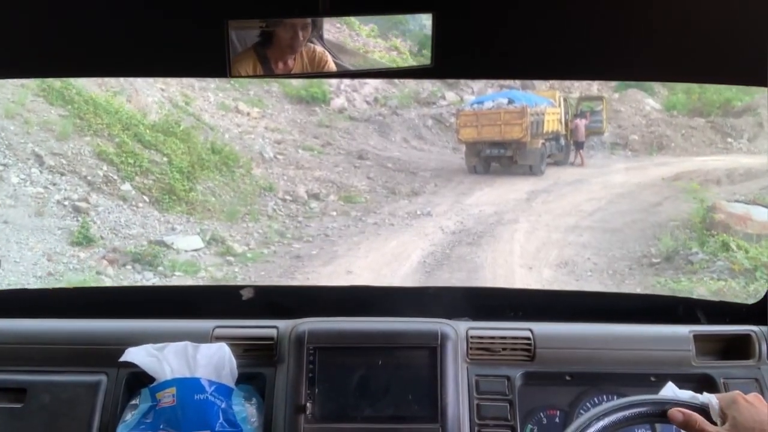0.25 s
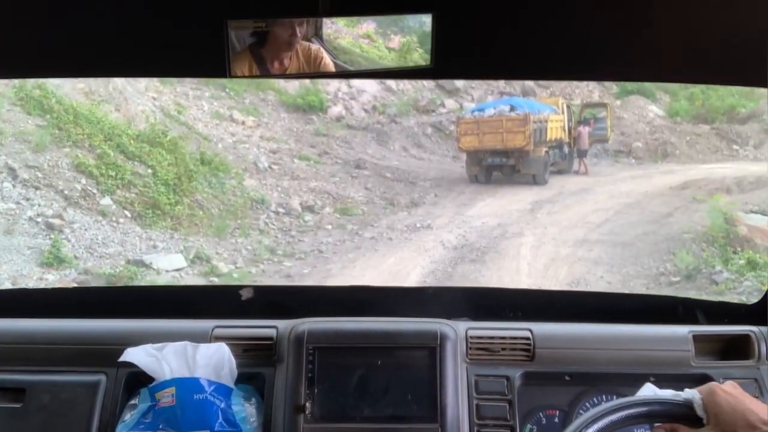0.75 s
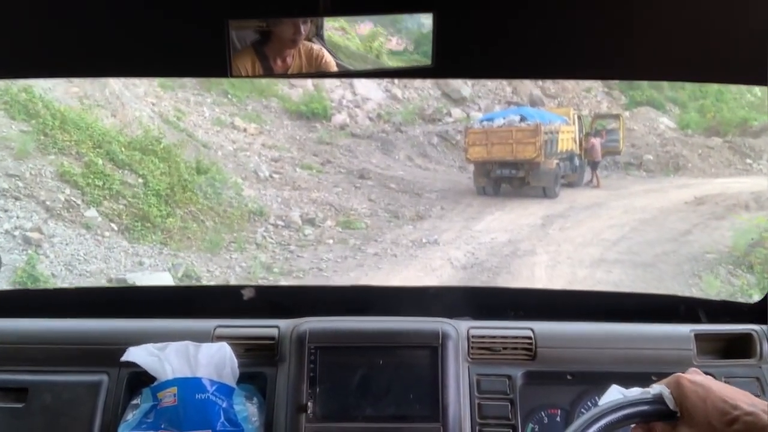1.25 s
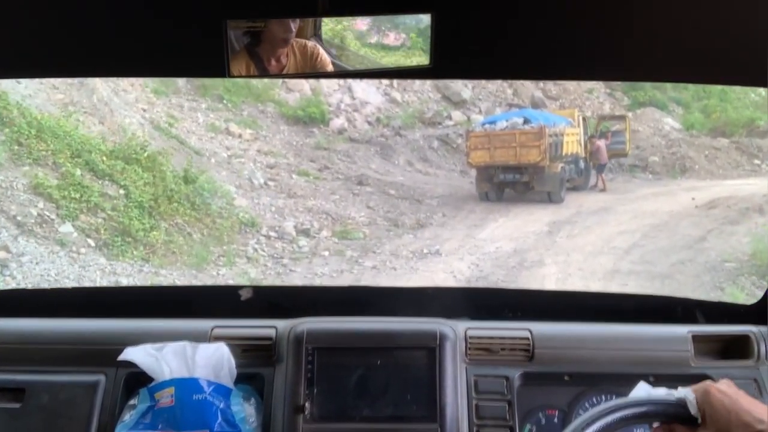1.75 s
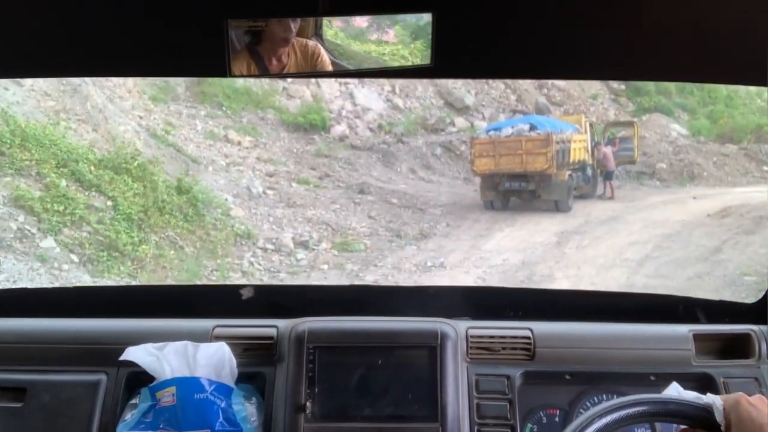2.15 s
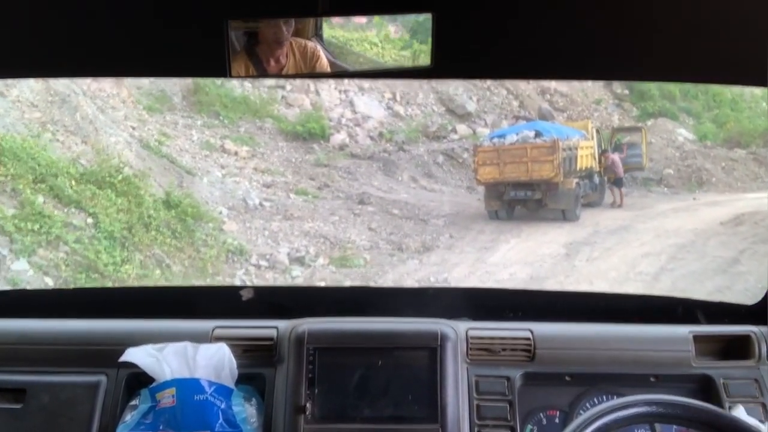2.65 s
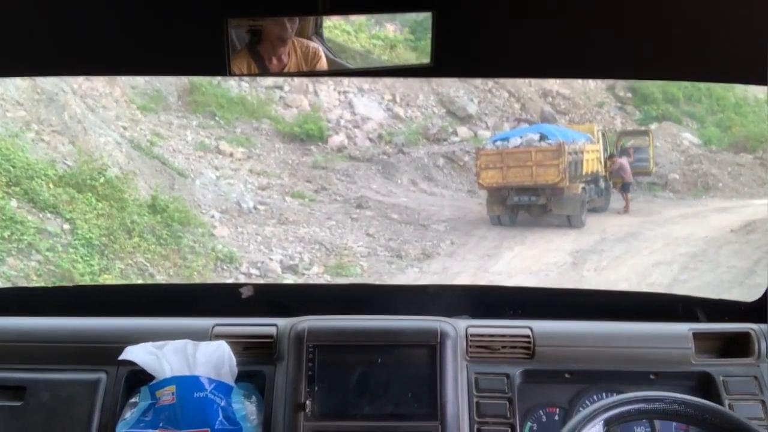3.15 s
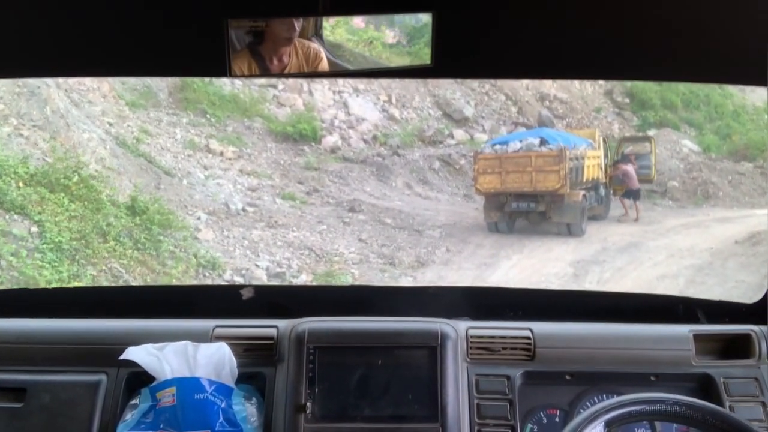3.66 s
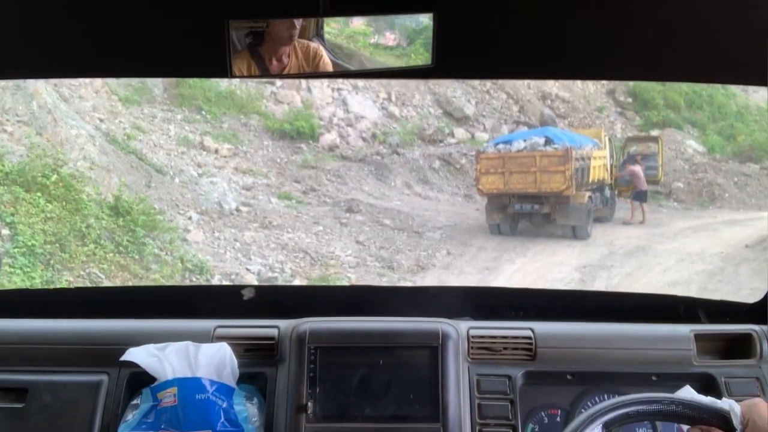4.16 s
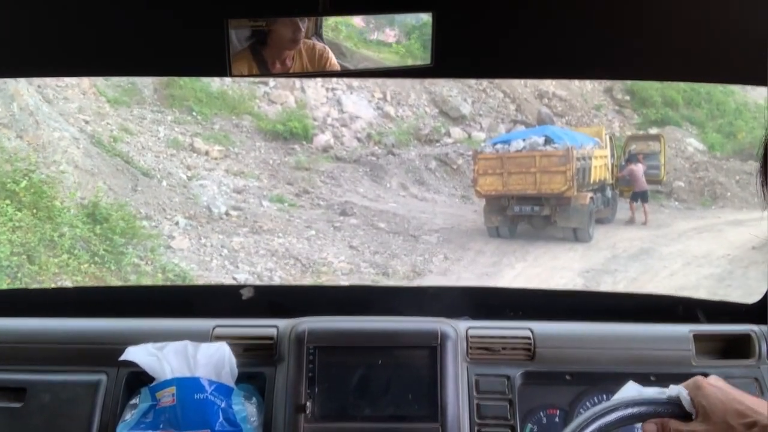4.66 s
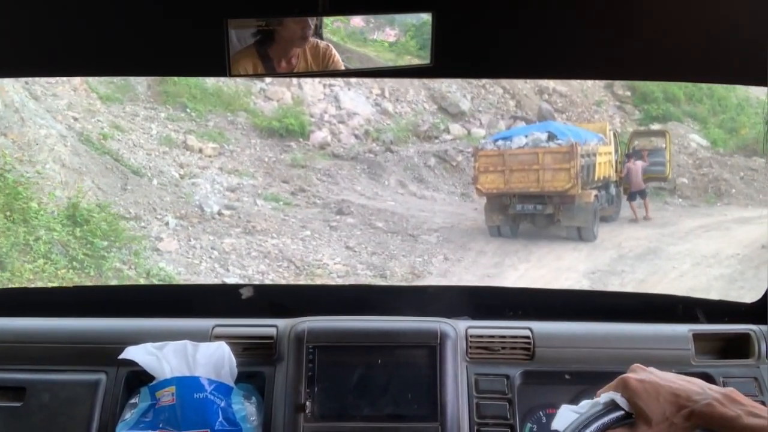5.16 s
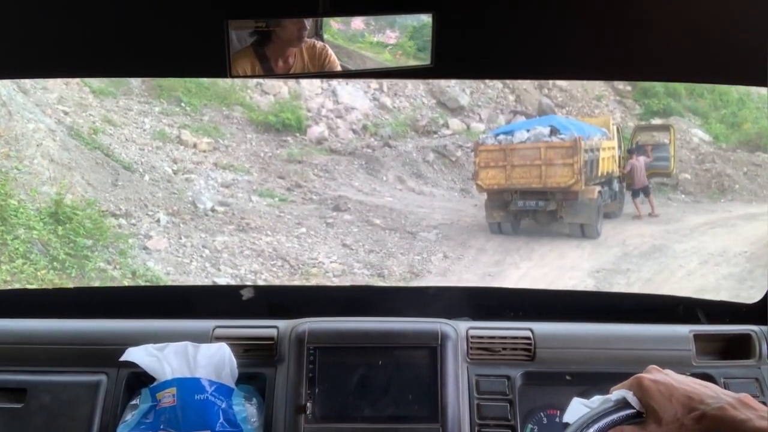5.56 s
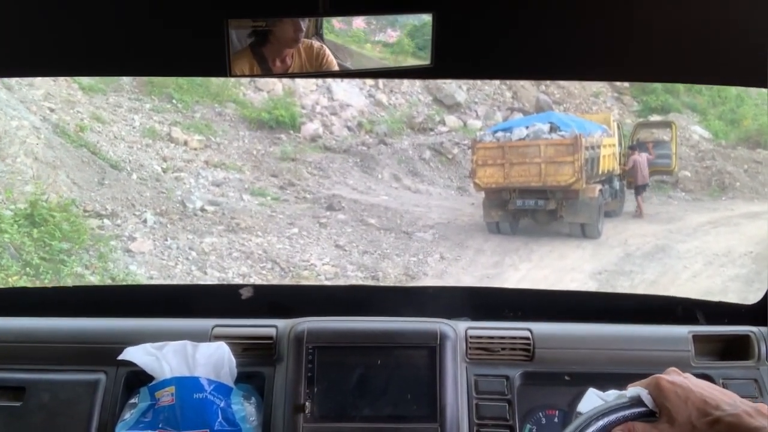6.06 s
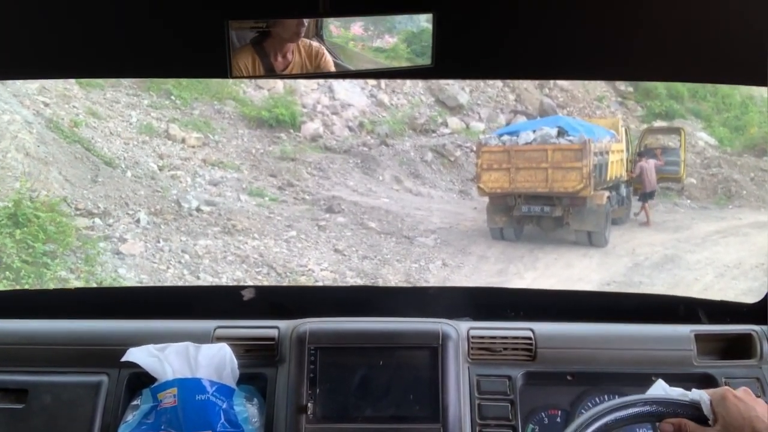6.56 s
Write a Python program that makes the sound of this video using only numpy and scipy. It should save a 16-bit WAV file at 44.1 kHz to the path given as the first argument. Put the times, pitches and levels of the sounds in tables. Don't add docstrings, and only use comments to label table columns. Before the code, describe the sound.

Inside a truck cab, a low diesel engine throbs and slowly winds down while trim rattles and the dashboard knocks on a rough dirt track.

```python
import sys
import numpy as np
from scipy import signal
from scipy.fft import rfft, irfft
from scipy.io import wavfile
from scipy.ndimage import uniform_filter1d

SR = 44100
rng = np.random.default_rng(int(sys.argv[2]) if len(sys.argv) > 2 else 0)


def file_out(sig):
    cols = np.atleast_2d(sig).T
    lim = np.clip(cols, -1, 1)
    pcm = np.round(lim * 32767).astype(np.int16)
    wavfile.write(sys.argv[1], SR, pcm)


def nominal_scale(level):
    x = np.asarray(level, float) / 20
    return 10 ** x


N = 300321
T = np.arange(N) / SR
SLOW = T[::256]
HZ = np.fft.rfftfreq(N, 1 / SR)

# time_s, firing_rate_hz, load_db
ENGINE_RUN = [(0.0, 35.35, -3), (0.2, 34.94, -5), (0.47, 35.18, -1.5), (0.75, 37.58, -6),
              (1.25, 37.27, -7.5), (1.6, 35.92, -5.5), (2.05, 34.52, -2.5), (2.42, 34.95, -1.5),
              (2.8, 34.05, -6.5), (3.3, 29.84, -4), (3.62, 31.65, -11), (4.0, 29.7, -8), (4.3, 28.24, -13),
              (4.8, 28.44, -5.5), (5.4, 23.57, -15.5), (5.85, 25.34, -14), (6.45, 25.42, -16),
              (6.81, 24.4, -19)]
# multiple, full_load_level_db, load_share
FIRING_MULTIPLES = [(1, -22.5, 1.13), (2, -31.5, 0.52), (3, -36.5, 1.13), (6, -50.5, 1.3)]
# multiple, full_load_level_db, load_share
SHAFT_MULTIPLES = [(1.5, -43.5, 0.7), (4, -47.5, 0.079), (5.5, -47, 0.74), (8, -48.5, 0.09),
                   (12, -60, 0.083)]
# pitch_hz, width_hz, lift_db
CAB_AIR = [(81, 2.1, 7.5), (113.3, 6, 10), (199.4, 8.1, 9), (299.7, 7.9, 2)]
SURGES = {1: [(4, -19, 0.087), (3.79, 7, 0.24), (2.05, 5.5, 0.27), (4.65, 6, 0.044), (5.25, 9, 0.11),
          (0.17, 2, .2), (0.9, 3.5, 0.33), (3.02, 1, 0.16)], 1.5: [(.95, 6, 0.12), (1.4, 20, 0.16),
          (1.8, 4, 0.097), (2.7, 8, 0.1), (5.3, 13, 0.072)], 2: [(1.2, 6.5, .6), (2.45, -8.5, 0.45),
          (3.95, 6.5, 0.091), (5.4, 2.5, 0.22)], 3: [(.2, 6.5, 0.18), (.9, 5, 0.31),
          (1.6, 6.5, 0.24), (2.7, -10, 0.093), (6.0, 20.5, 0.19)]}
MORE_SURGES = {4: [(4.575, 17, 0.4), (4.62, -7.5, 0.078), (2.22, 6, 0.12), (0.47, -9, 0.27),
               (3.45, 7, 0.092), (3.45, 7, 0.092), (6.0, 11, .15)], 5.5: [(.4, 5.5, 0.31), (1.3, 3.8, .3)],
               6: [(2.15, 14.4, 0.35), (2.95, 8, 0.21)], 8: [(3.2, 13.2, .12), (4.65, 12.2, 0.34),
               (5.1, 10.8, 0.051), (5.45, 12.5, 0.16), (5.9, 12, 0.17), (6.22, 18.6, 0.03),
               (2.6, 5.6, 0.14)], 8.5: [(.3, 11.3, 0.4), (1.72, 6.9, 0.05), (2.4, 6, 0.25),
               (2.85, 13, 0.12)], 12: [(5.77, 16.7, 0.37), (5.5, 9.9, .08)]}
# pitch_hz, width_hz, level_db, cycle_share (0-1, gated by the engine cycle)
BLOCK_RINGS = [(483, 77, -50, 0.36), (823.6, 28, -57.5, 0.22), (1079, 165, -55, 0.37), (1439, 39, -61, 1),
               (2226, 54, -67.5, 0.46), (3306, 61, -69, 0), (4120, 18, -80, 0)]
# centre_s, level_db, half_length_s
INJECTOR_KNOCK = [(4.5, 10, .68)]

# start_s, peak_db, centre_hz, length_s
RATTLES = [(0.026, -27.5, 1865, 0.013), (0.1, -28.5, 1920, 0.02), (0.29, -32.5, 1960, 0.04),
           (1.105, -29.5, 2410, 0.045), (1.142, -35, 3460, 0.072), (1.253, -30.5, 2920, 0.037),
           (1.281, -26, 1811, 0.044), (1.5276, -28, 1740, 0.025), (2.108, -41, 1610, 0.06),
           (2.527, -26.5, 1760, 0.022), (2.759, -22, 1960, 0.0081), (3.013, -39, 2127, 0.016),
           (3.707, -31.5, 4850, 0.053), (3.797, -31.5, 2222, 0.019), (3.861, -34.5, 1952, 0.043),
           (3.91, -35, 2099, 0.087), (4.267, -34, 1932, 0.018), (4.47, -40, 1782, 0.031),
           (2.806, -42, 1500, 0.038), (5.26, -34, 1950, 0.012), (5.411, -33.5, 3830, 0.043),
           (5.475, -36.5, 2858, 0.071), (5.8241, -35.5, 1763, 0.034), (6.2032, -36.5, 2700, 0.058),
           (6.244, -32.5, 2080, 0.024), (6.418, -34, 1914, 0.023), (6.474, -37.5, 1996, 0.039),
           (6.612, -31.5, 1743, 0.032), (6.712, -28.5, 2456, 0.0093), (6.7795, -25, 1683, 0.014)]
# centre_s, level_over_rest_db, half_length_s
CLATTER = [(1.05, 6, .08), (1.56, 16, 0.043), (2.14, 26.5, 0.08), (2.52, 26, 0.075), (2.87, 20, 0.059),
           (3.3, 19, .04), (5.47, 14, .07), (5.85, 20, .05), (6.24, 23.5, 0.062), (6.47, 21, 0.057),
           (6.6, 22, 0.061), (6.73, 11, .03)]
# start_s, peak_db, pitch_hz
KNOCKS = [(0.114, -31, 920), (1.014, -26, 816), (1.128, -24, 1000), (1.291, -34, 1240), (1.53, -23, 1030),
          (1.562, -30.5, 880), (1.679, -25.5, 860), (2.075, -24.5, 840), (2.19, -26.5, 825),
          (2.257, -30, 1052), (2.445, -23.5, 892), (2.513, -25, 894), (2.544, -21, 800), (2.569, -27, 824),
          (2.617, -30, 832), (2.811, -22, 974), (2.829, -26, 840), (2.859, -25.5, 856), (2.899, -27.5, 704),
          (3.285, -28.5, 750), (3.805, -31, 850), (4.477, -24, 1090), (5.449, -32, 870),
          (6.097, -36, 720.3), (6.207, -31, 731), (6.232, -33, 795), (6.432, -28.5, 979),
          (6.555, -27.5, 934), (6.627, -28, 1025), (6.721, -29.5, 805)]
# centre_s, pitch_hz, level_db, length_s
SQUEAKS = [(3.98, 2200, -50, .04), (2.565, 6300, -56, .012), (4.285, 4300, -51, .015)]

# time_s, roughness_db (against its usual level)
ROAD = [(0.0, 2), (0.2, 2), (0.8, 1.5), (1.2, 4), (1.45, 2), (2.05, 1), (2.55, 2.5), (2.96, 1.5), (3.3, -2),
        (3.8, -0.5), (4.2, -3), (5.2, -5), (5.5, -2.5), (5.9, -3.5), (6.33, -4), (6.6, -1.5), (6.81, -3)]
# pitch_hz, width_hz, level_db
PANEL_MODES = [
    [(30.2, 8.5, -8), (48.2, 11.6, -3.5), (63.8, 7, -7.5), (76.65, 5.2, -6)],
    [(199, 14, -4), (146.9, 9.2, -7)],
    [(297.1, 18.2, -4), (108.86, 9.6, -2)],
]
# centre_s, level_db, half_length_s
JOLTS = [
    [(.04, 14.5, 0.042), (1.55, 7.5, 0.071), (2.68, 5.5, 0.025), (3.92, 3, 0.11), (5.32, 9.5, 0.045),
     (6.1, 0.5, 0.099), (6.38, 3.5, .08), (6.75, 5.5, .08), (5.7, 2.5, 0.14)],
    [(0.48, 2.5, 0.43), (5.72, -11.5, 0.13), (5.7, 18, 0.1), (5.6, 0, 0.049), (1.49, 7.5, 0.11)],
    [(.32, 11.5, .15), (1.72, 9, 0.02), (2.05, 5, 0.044), (2.65, 8.5, 0.25), (3.95, 8, 0.055),
     (5.82, 14.5, 0.034), (6.24, 10.5, 0.055)],
]

# pitch_hz, density_db (per Hz)
SHARED_COLOUR = [(15, -40), (28, 3), (61, -3), (160, -10.5), (210, -12.5), (360, -18.5), (500, -22),
                 (4800, -51.5), (6900, -62), (7600, -69), (8400, -82), (9300, -70), (10200, -64.5),
                 (12900, -63), (15100, -66.5), (15700, -91)]
# pitch_hz, density_db (per Hz)
OPPOSED_COLOUR = [(15, -40), (28, -13), (64, -4.5), (160, -13.5), (304, -12.5), (367, -15.5), (507, -14.5),
                  (967, -21.5), (1790, -31.5), (8700, -54), (10800, -56), (12400, -76.5), (13700, -65.5),
                  (15600, -53.5), (15900, -94)]
# centre_s, level_over_hiss_db, half_length_s
VENTS = [(.0, 3.5, .07), (2.55, 3, 0.16), (3.82, 5.5, 0.16), (5.85, 4.5, 0.065), (6.55, 7.5, 0.065),
         (6.7, -1, 0.051)]
# start_s, level_over_hiss_db
STRAY_PUFFS = [(.02, 7.5), (.24, 10), (1.53, 8), (2.95, 0), (3.155, -1), (3.47, 0.5), (3.6, 2),
               (4.279, 3.5), (4.47, 1), (5.175, 3), (5.7, 6.5), (6.206, 10), (6.768, 21)]
# pitch_hz, left_minus_right_db
LEFT_BIAS = [(60, 4.5), (200, 3), (700, 3), (2400, 5.5), (4400, 3), (7000, .1)]


def unit(x):
    return x / np.sqrt(np.mean(x ** 2))


def curves(table):
    s, *columns = np.transpose(table)
    return [np.interp(T, s, c) for c in columns]


def along_hz(table):
    hz, value = np.transpose(table)
    return np.interp(np.log(HZ + 1), np.log(hz), value)


def swells(rows):
    level_db = 0 * SLOW
    for s, db, half in rows:
        level_db = level_db + db * np.exp(-np.abs((SLOW - s) / half) ** 3)
    return np.interp(T, SLOW, level_db)


def walk(rate):
    hold = int(SR / rate)
    steps = np.repeat(rng.standard_normal(N // hold + 1), hold)
    slewed = uniform_filter1d(uniform_filter1d(steps, hold), hold)
    return unit(slewed[:N])


def ring(x, hz, width):
    band = [hz - width / 2, min(hz + width / 2, .45 * SR)]
    sos = signal.butter(1, band, "bandpass", fs=SR, output="sos")
    return signal.sosfilt(sos, signal.sosfilt(sos, x))


def cab_lift(hz):
    slow_hz = hz[::256]
    lift_db = sum(db * np.exp(-((slow_hz - at) / width) ** 2) for at, width, db in CAB_AIR)
    return np.interp(T, SLOW, lift_db)


def multiples(rows, phase, hz, load_db, wobble):
    surges = SURGES | MORE_SURGES
    out = np.zeros(N)
    for k, db, share in rows:
        level_db = db + share * load_db + cab_lift(k * hz) + swells(surges.get(k, []))
        level_db += 1.2 * walk(5.0)
        out += np.sqrt(2) * nominal_scale(level_db) * np.sin(2 * np.pi * k * phase + wobble * walk(25))
    return out


def firings(phase, hz, load_db):
    thumps = multiples(FIRING_MULTIPLES, phase, hz, load_db, .08)
    return thumps + multiples(SHAFT_MULTIPLES, phase, hz, load_db, .2)


def gear_whine(phase, hz, load_db):
    return multiples([(8.5, -46, 1.4)], phase, hz, load_db, 0.55)


def block_rings(phase):
    cycle_age = (phase - phase[int(4.63 * SR)]) / 4 % 1
    cycle = unit(np.exp(-cycle_age / .2) * nominal_scale(swells(INJECTOR_KNOCK)))
    out = np.zeros(N)
    for hz, width, db, gated in BLOCK_RINGS:
        drive = rng.standard_normal(N) * (1 - gated + gated * cycle)
        out += nominal_scale(db) * unit(ring(drive, hz, width))
    return out


def trim_rattles():
    out, age = np.zeros((2, N + SR)), T[:SR // 5]
    for s, db, hz, length in RATTLES:
        clicks = rng.standard_normal((2, len(age))) * nominal_scale(2.1 * rng.exponential(size=len(age)))
        chatter = unit(ring(clicks, hz, 380.0)) * 0.21 + unit(ring(clicks, 2450.0, 3700.0))
        env = (1 - np.exp(-age / 0.0024)) * np.exp(-age / max(length, .005))
        out[:, int(s * SR):][:, :len(age)] += nominal_scale(db - 12.0) * env * chatter
    modes_hz = (1440, 1900, 2200, 2500, 2850, 3270, 3600, 3900, 4250, 4750, 5400)
    out += nominal_scale(2.0) * sum(ring(out, hz, 90) for hz in modes_hz)
    return out[:, :N]


def dashboard_clatter():
    grains = rng.standard_normal((2, N)) * nominal_scale(3.3 * rng.exponential(size=N))
    return nominal_scale(-68 + swells(CLATTER)) * unit(ring(grains, 900, 720))


def dashboard_knocks():
    out, age = np.zeros((2, N + SR)), T[:SR // 5]
    env = (1 - np.exp(-age / 0.0017)) * np.exp(-age / 0.018)
    for s, db, hz in KNOCKS:
        blow = rng.standard_normal((2, len(age))) * env
        knock = ring(blow, hz, 160.0) + 0.68 * ring(blow, 676.0, 790.0)
        out[:, int(s * SR):][:, :len(age)] += nominal_scale(db - 2.5) * knock / np.abs(knock).max()
    return out[:, :N]


def squeaks():
    out = np.zeros((2, N))
    for s, hz, db, length in SQUEAKS:
        env = np.exp(-((T - s) / length) ** 2)
        out += nominal_scale(db) * env * unit(ring(rng.standard_normal((2, N)), hz, 70.))
    return out


def cab_fittings():
    loose = trim_rattles() + dashboard_clatter() + dashboard_knocks()
    top_cut = signal.butter(8, 6300, fs=SR, output="sos")
    return signal.sosfilt(top_cut, loose) + squeaks()


def road_shake():
    roughness_db, = curves(ROAD)
    rest_db, road_share = (-29.5, -37, -40), (0.15, 0.33, 0.95)
    out = np.zeros(N)
    for modes, level_db, share, jolts in zip(PANEL_MODES, rest_db, road_share, JOLTS):
        shake_db = level_db + share * roughness_db + swells(jolts)
        for hz, width, db in modes:
            out += nominal_scale(shake_db + db) * unit(ring(rng.standard_normal(N), hz, width))
    return out


def valve_puffs(phase):
    cycle = (phase - phase[int(1.81 * SR)]) // 4
    s = T[1:][np.diff(cycle) > 0]
    db = 5 + 2.3 * rng.standard_normal(len(s))
    pulling = (s > .25) & (s < 3.0)
    regular = [s[pulling], db[pulling]]
    times, peaks_db = np.concatenate([regular, np.transpose(STRAY_PUFFS)], axis=1)
    env, age = np.zeros(N + SR), T[:SR // 4]
    shape = (1 - np.exp(-age / .02)) * np.exp(-age / .03)
    for start, peak_db in zip(times, peaks_db):
        env[int(start * SR):][:len(age)] += peak_db * shape / shape.max()
    return env[:N]


def cabin_noise(phase):
    roar_db, = curves(ROAD)
    buzz_db = 2 + 0.47 * roar_db
    hiss_db = 10 + 0.32 * roar_db + swells(VENTS) - 2.5 + .75 * valve_puffs(phase)
    colours = np.array([rfft(rng.standard_normal(N)) * nominal_scale(along_hz(c))
                        for c in (SHARED_COLOUR, OPPOSED_COLOUR)])
    roar_band = (HZ > 350) * (HZ < 1500)
    colours /= irfft(colours * roar_band, N).std(axis=1)[:, None]
    edges_hz = [0, 350, 700, 1500, 2500, 4000, 5500, 7000, 8800, 11500, 16000]
    swell, out = walk(11), np.zeros((2, N))
    for lo, hi in zip(edges_hz, edges_hz[1:]):
        place = np.interp(lo, [700, 1500, 8800], [0, 1, 2])
        db = max(1 - place, 0) * roar_db + (1 - abs(place - 1)) * buzz_db + max(place - 1, 0) * hiss_db
        band = irfft(colours * (HZ >= max(lo, 42)) * (HZ < hi), N)
        out += nominal_scale(db + .45 * swell + .85 * walk(20)) * band
    return out * nominal_scale(np.array([[-40.5], [-40.6]]))


def port_difference(shared):
    level = along_hz(LEFT_BIAS) * np.log(10) / 40
    lag_s = 0.00032 * np.exp(-(HZ / 1500) ** 2)
    level_and_lag = np.tanh(level - 1j * np.pi * HZ * lag_s)
    ends_meet = shared - np.linspace(shared[0], shared[-1], N)
    return irfft(rfft(ends_meet) * level_and_lag, N)


def scene():
    hz, load_db = curves(ENGINE_RUN)
    phase = np.cumsum(hz) / SR
    shared, opposed = cab_fittings() + cabin_noise(phase)
    shared += firings(phase, hz, load_db) + block_rings(phase) + road_shake()
    whine = gear_whine(phase, hz, load_db)
    shared += 0.83 * whine
    opposed -= .9 * whine
    tilt = port_difference(shared)
    return np.array([shared + tilt + opposed, shared - tilt - opposed])


def roll_off(x):
    return signal.sosfilt(signal.butter(12, 15550, fs=SR, output="sos"), x)


def record(dry):
    return roll_off(dry)


dry = scene()
out = record(dry)
file_out(out)
```